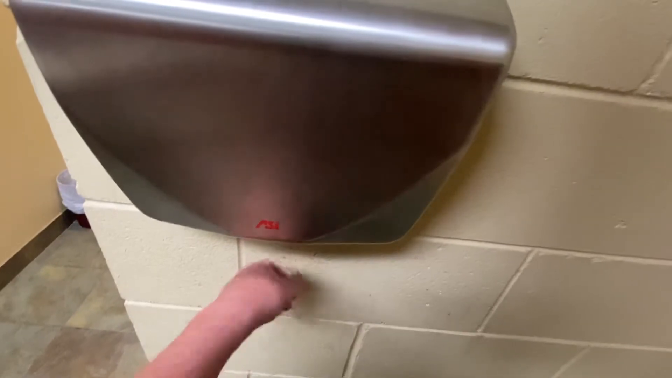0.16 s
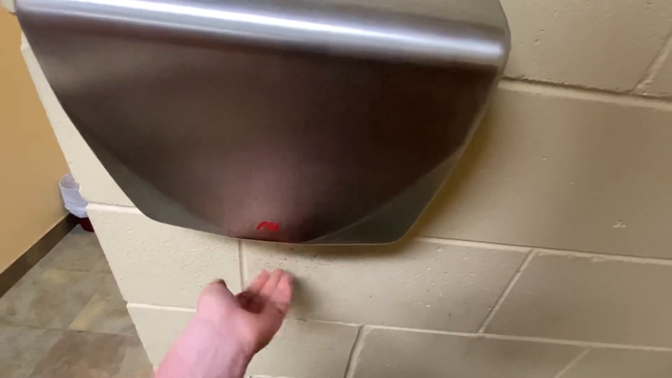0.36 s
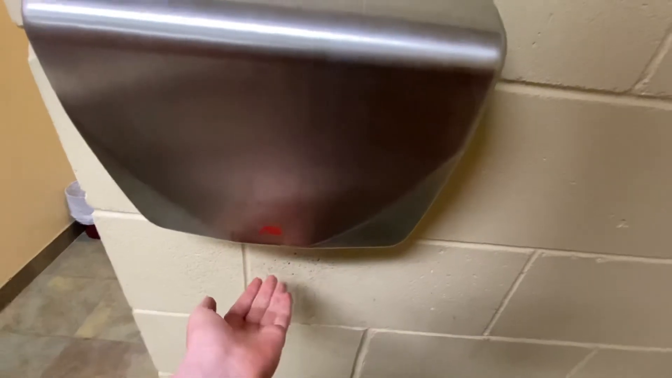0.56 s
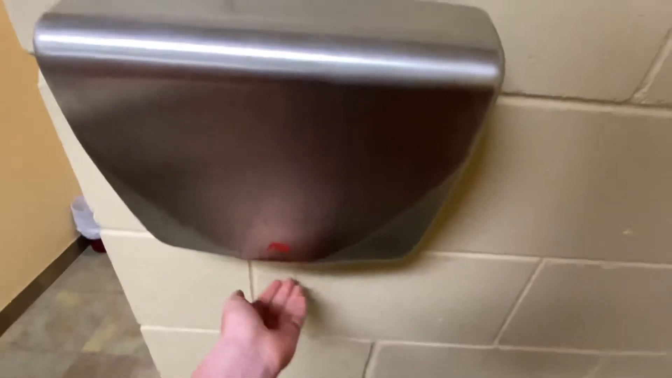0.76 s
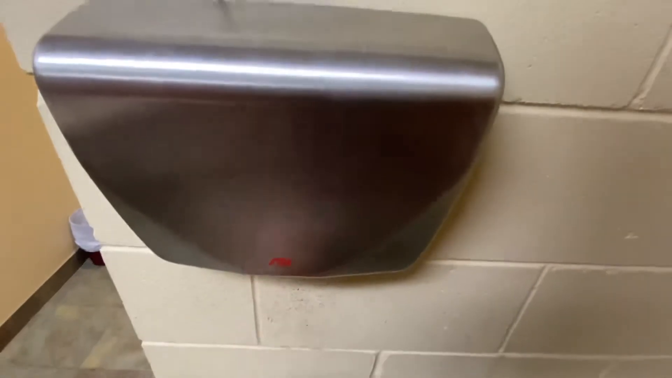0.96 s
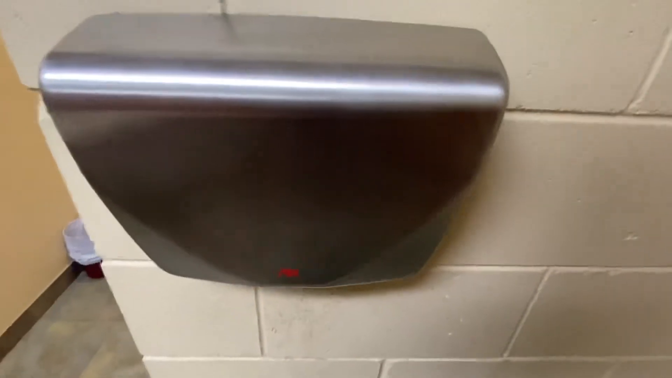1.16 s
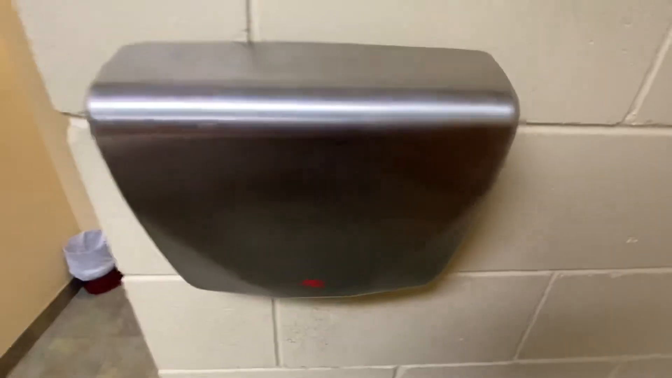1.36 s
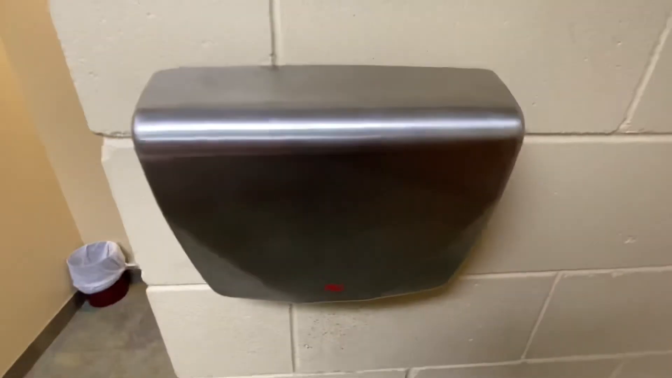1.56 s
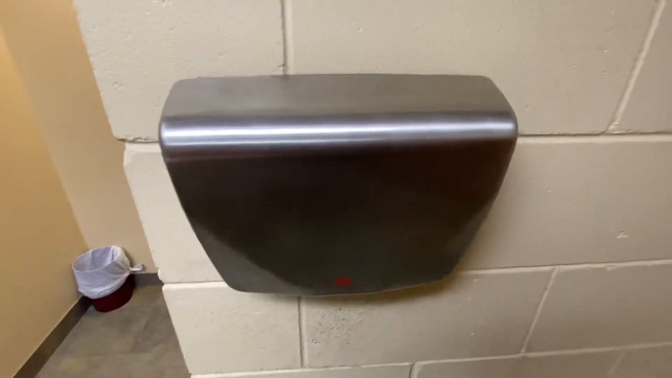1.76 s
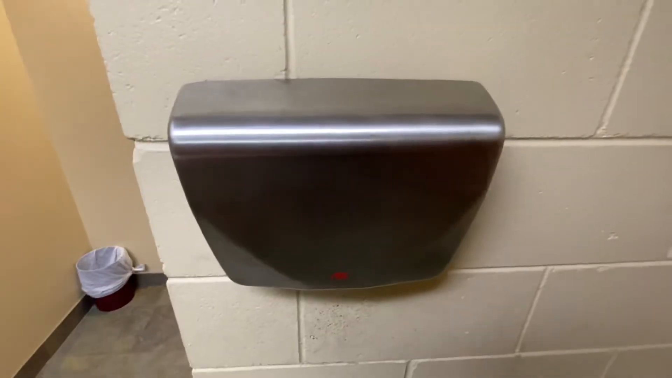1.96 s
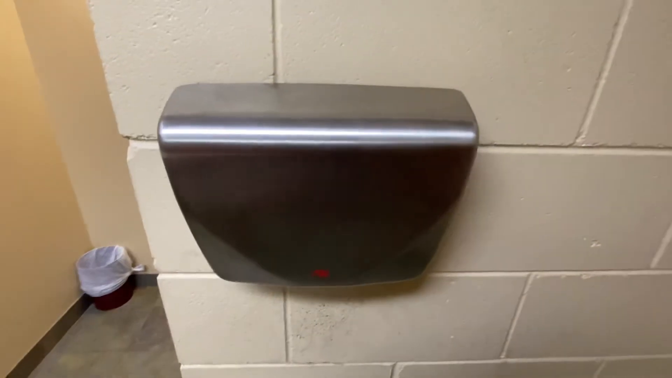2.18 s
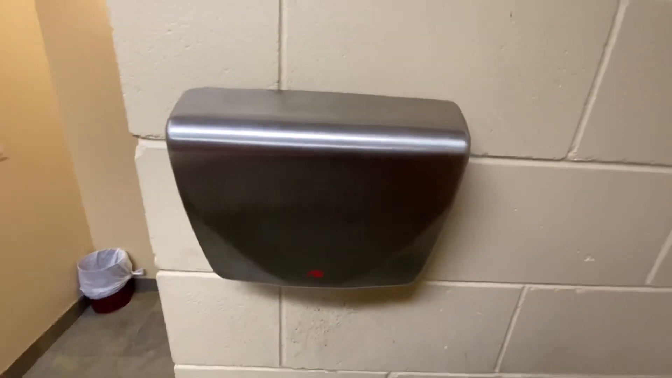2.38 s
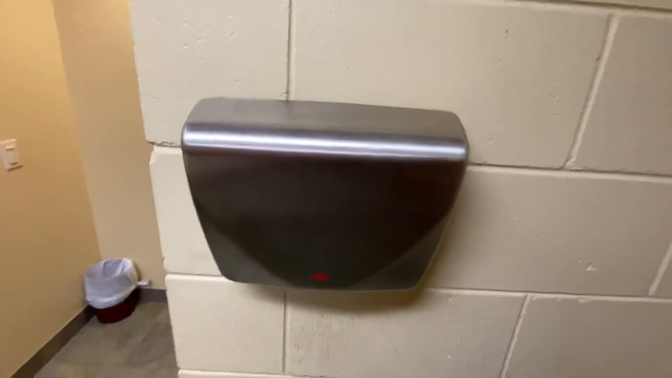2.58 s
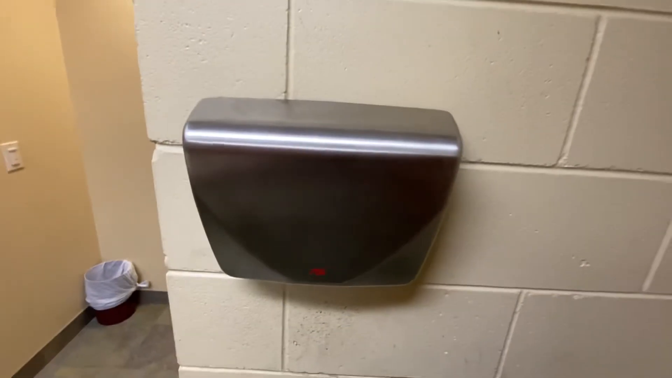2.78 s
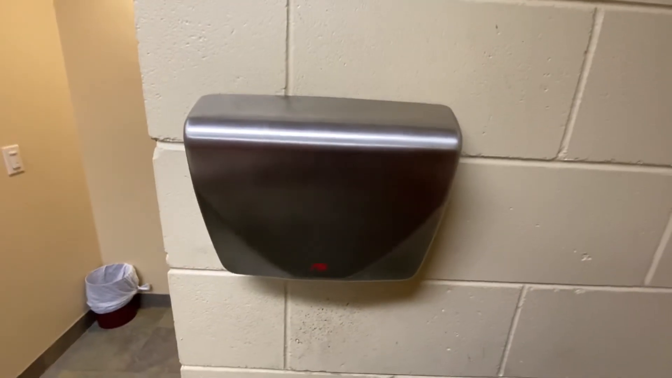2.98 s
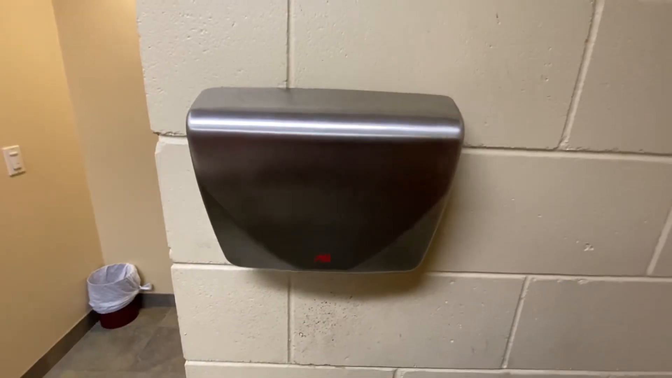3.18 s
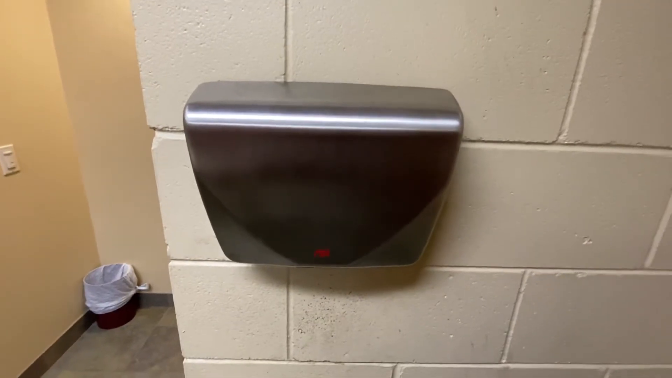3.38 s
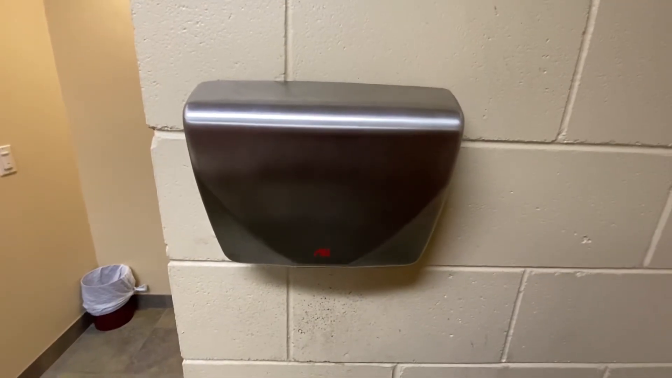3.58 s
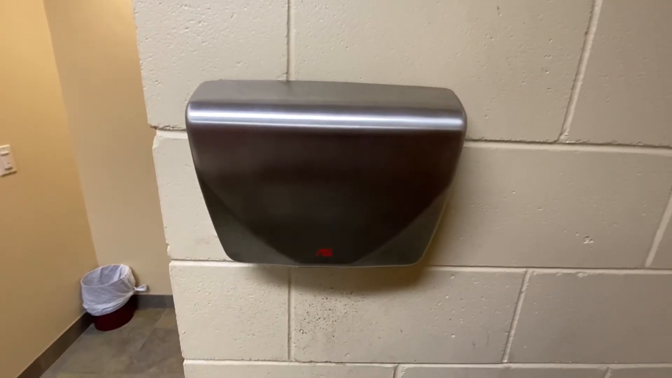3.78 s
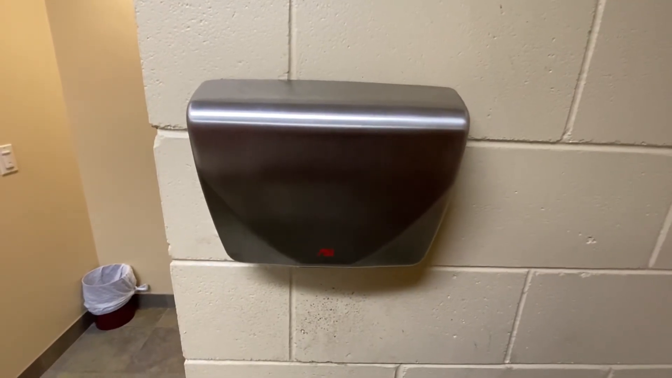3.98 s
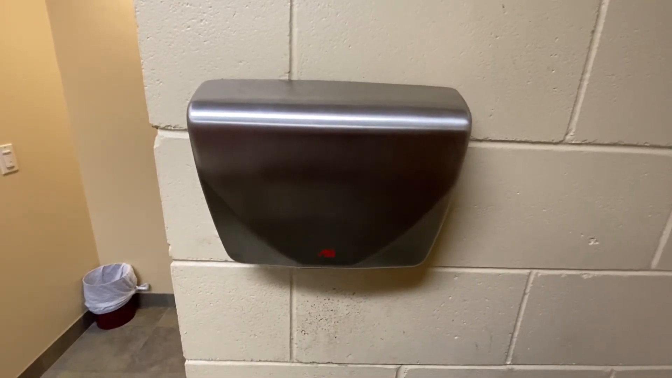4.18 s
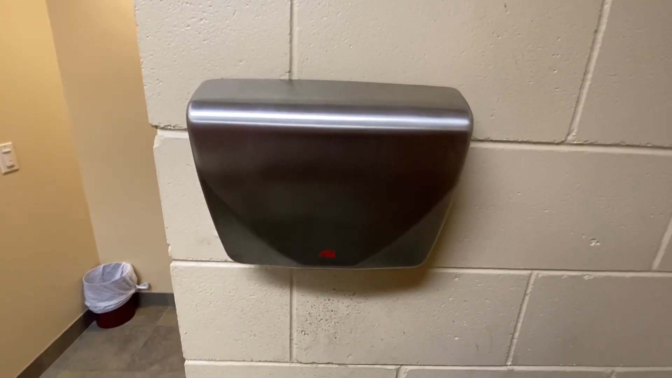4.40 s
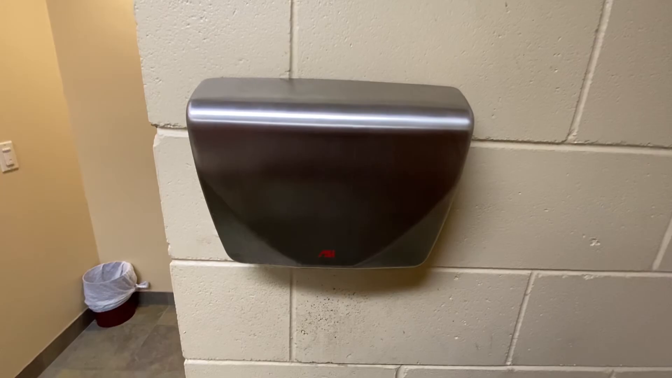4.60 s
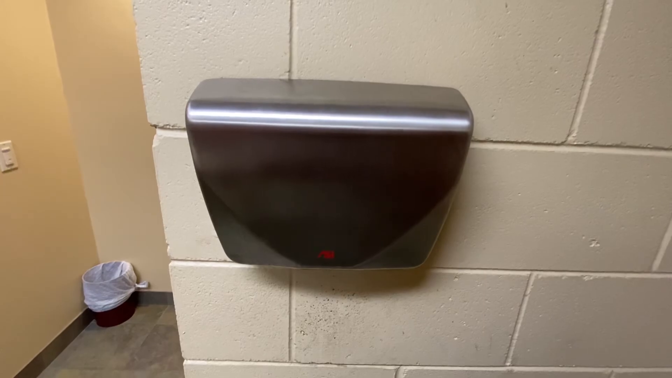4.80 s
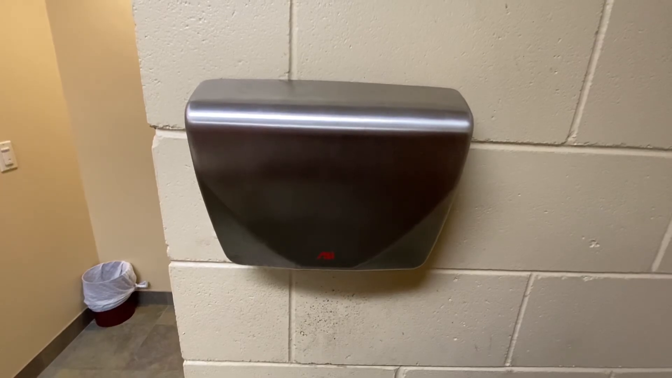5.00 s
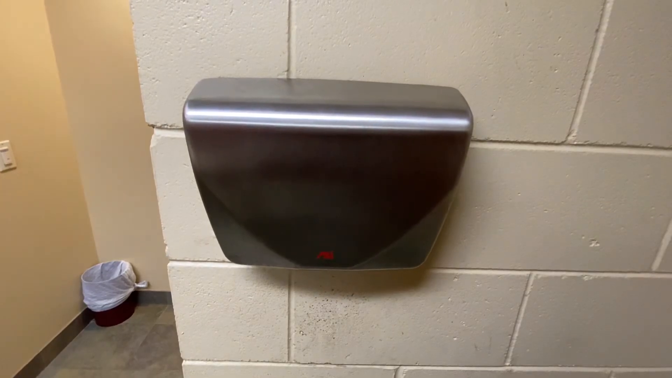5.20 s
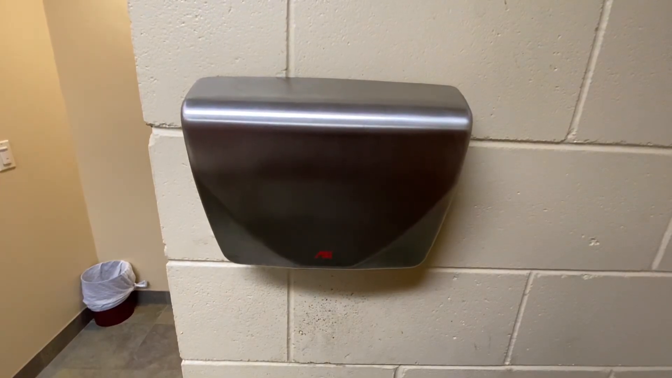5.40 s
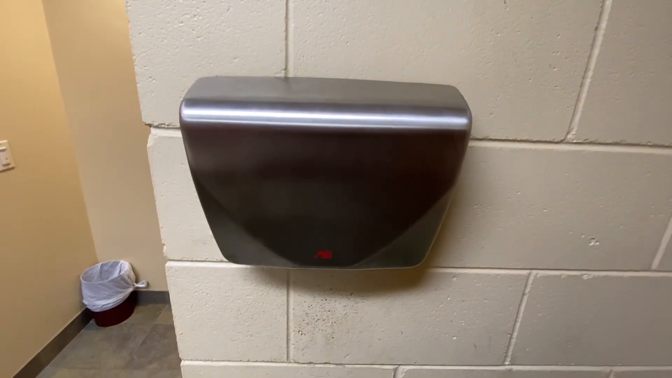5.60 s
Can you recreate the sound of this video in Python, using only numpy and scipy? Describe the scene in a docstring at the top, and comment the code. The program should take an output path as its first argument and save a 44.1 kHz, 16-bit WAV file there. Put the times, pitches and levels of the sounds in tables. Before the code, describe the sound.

Loud rushing air and a shrill whine in a hard-walled restroom wind down smoothly, leaving low fan hum and duct rumble.

```python
"""A roaring air jet and a motor whine come first: a wall hand dryer in a block-walled restroom.
The jet is shaped noise with swelling resonances; the whine is the harmonics of blades chopping the air.
Power drops and the rotor coasts nearly to rest, its whine sweeping down through the casing resonances.
Mains buzz dies away with the motor; the building's ventilation stays as rumble, fan tones and hum.
All is heard from a phone that backs away from the dryer."""
import sys
import numpy as np
from scipy import signal
from scipy.fft import rfft, irfft
from scipy.io import wavfile
from scipy.ndimage import uniform_filter1d

SR = 44100
rng = np.random.default_rng(int(sys.argv[2]) if len(sys.argv) > 2 else 0)


def wav_out(sig):
    """Save sig, one row per channel (or a flat mono array), as 16-bit PCM at SR to the path in sys.argv[1]."""
    wavfile.write(sys.argv[1], SR, np.round(np.clip(np.atleast_2d(sig).T, -1, 1) * 32767).astype(np.int16))


N = 249165
TIME = np.arange(N) / SR
HZ = np.maximum(np.fft.rfftfreq(N, 1 / SR), 1)

# Resonances of jet, casing, wall and room, before the room echoes:
# (centre [Hz], width of each of two passes [Hz], level at full speed [dB],
#  swells: [(time [s], half-length to 1/e [s], level [dB])])
JET_RESONANCES = [(196.3, 25.6, -79, [(.1, 0.62, -41.5), (1.15, 0.86, -42), (1.74, 0.038, -30),
                  (2.03, 0.1, -35.5)]), (287, 113, -57.5, [(3.2, .7, -48.5)]),
                  (424, 280, -57, [(.35, 0.42, -35), (1.35, 0.16, -43.5), (2.3, 0.13, -43)]),
                  (861.4, 180, -38, [(.23, 0.18, -47), (1.65, 0.82, -42), (2.9, 0.3, -47)]),
                  (917, 150, -63, [(1.5, 0.016, -35), (1.78, 0.11, -31.5)]),
                  (1165, 135, -56, [(.4, 0.56, -33.5), (1.38, 0.1, -42)]),
                  (1387, 78, -69, [(4.8, 0.35, -49.5)]), (1429, 76, -62.5, [(1.05, 0.28, -41),
                  (1.65, 0.11, -41)]), (2401, 150, -51, [(2.45, .15, -48), (3.22, 0.15, -46)]),
                  (4000, 1300, -67, [(3.8, .3, -53), (4.6, 0.37, -58)]),
                  (3048, 180, -42.5, [(.65, 0.25, -44), (1.1, 0.12, -45), (1.8, .15, -47),
                  (2.9, 0.065, -52)]), (3160, 690, -36.5, [(0.0, 0.043, -27), (.6, 0.88, -42),
                  (1.74, 0.14, -49), (2.8, 0.16, -44)])]
# Jet spectrum: (frequency [Hz], relative level per Hz [dB])
JET_COLOUR = [(40, -17), (70, -19), (90, -20), (140, -11.5), (200, -9), (400, -11), (600, -12.5), (870, -9),
              (1300, -11.5), (2600, -13.5), (3300, -16.5), (4500, -15.5), (6600, -18.5), (7200, -27.5),
              (10500, -25.5), (12300, -39), (14500, -35.5)]
# Casing resonances: (centre [Hz], width of each of two passes [Hz], relative level [dB])
CASING_MODES = [(438, 40, -10), (878, 60, 0), (1120, 40, -7), (1190, 45, -12), (1295, 45, -3),
                (1365, 65, 1), (1900, 120, -20), (2200, 60, -19), (2380, 130, -16), (2880, 120, -13),
                (3280, 300, -20), (3550, 160, -13), (4200, 500, -8)]
# Harmonics of the blade rate, from the first up: (level under the whine [dB])
WHINE_HARMONICS_DB = [0, -4, -5, -7, -12, -14, -15, -16, -17, -18]
# Weaker tones heard while the motor is driven: (multiple of the shaft rate, level under the whine [dB])
SHAFT_TONES = [(3, -28), (4, -17), (6, -15)]
# Whine before the casing colours it: (time [s], level [dB])
WHINE_LEVEL = [(0, -34), (.2, -35), (.32, -44), (.5, -34), (.66, -34), (.73, -42), (.85, -35), (1.0, -42),
               (1.15, -35), (1.28, -36), (1.45, -47), (1.6, -37), (1.75, -30.5), (2.1, -30.5), (2.18, -39),
               (2.32, -32), (2.75, -31.5), (2.9, -36), (3.02, -43), (3.2, -38), (3.32, -42), (3.5, -43),
               (3.6, -49), (3.66, -45), (4.12, -44.5), (4.4, -48), (4.7, -52), (4.85, -58), (5.0, -60),
               (5.15, -66), (5.3, -80)]
# Mains buzz of the running motor, before it fades: (multiple of the mains, left [dB], right [dB])
BUZZ_TONES = [(1, -38, -31), (3, -34.5, -42.5), (4, -42.5, -41.5), (5, -54, -44.5), (6, -41.5, -56),
              (7, -41.5, -70), (8, -58, -51), (9, -39.5, -75)]
# Fan tones of the ventilation: (frequency [Hz], left [dB], right [dB])
VENT_TONES = [(47.5, -65, -56), (52, -54, -61), (57.87, -47.5, -42), (64.3, -73, -78), (102, -60, -52),
              (113.3, -65, -58), (242.4, -64.5, -50)]
# Hum at twice the mains, midway between left and right: (time [s], level [dB])
HUM_LEVEL = [(0, -38.5), (1.3, -40), (2.1, -42), (2.8, -43), (3.5, -42.5), (5.65, -39)]
# Duct rumble spectrum: (frequency [Hz], relative level per Hz [dB])
VENT_COLOUR = [(40, -19), (70, -20), (85, -9), (130, -27.5), (200, -20), (300, -19.5), (390, -15),
               (440, -25), (700, -19), (900, -18), (1100, -29), (2200, -34.5), (4000, -62), (6500, -52),
               (8000, -59), (10500, -64), (14500, -82)]
# Low room resonances added to the rumble: (centre [Hz], width [Hz], level over the rumble [dB])
VENT_MODES = [(158.9, 2.4, 28.5), (299.7, 19, 14), (347, 39, 1.5)]
# Likeness of left and right noise, before limiting: (frequency [Hz], correlation [-1 to 1])
LIKENESS = [(60, 0.97), (130, 1), (290, 0.65), (630, 0.2), (1390, -0.2), (3040, -0.17), (6660, 0.4),
            (14600, 0.37)]
# Stereo balance of the dryer: (frequency [Hz], left minus right [dB])
LEAN = [(60, -10), (110, -9), (200, -3), (370, -0.5), (690, 4), (1270, 2), (2340, -2), (4300, 2), (7920, 1),
        (14600, -1.5)]

# rotor speed is counted as the blade-passing rate; the drive loses a share at switch-off, then ramps to nothing
FULL_HZ, FLOOR_HZ, BLADES = 3324, 20, 7
OFF_S, OFF_STEP, RAMP_S = 2.66, .15, .7
FRICTION_HZ_PER_S, DRAG_HZ_PER_S = 515, 5600  # braking by brushes, and by air at full speed
SPEED_STEP_S = .01

JET_DB, BACKING_DB_PER_S = -29.5, -.5  # at full speed; loss as the phone backs away
JET_LAW, JET_END_DB = 1.504, -64.5  # dB of roar per dB of speed; what lingers at the end
DRIVE_DB = 2.5  # roar added while the motor is driven
# treble slope: dB per octave at full speed, change per dB of speed, lowest dB per octave
SLOPE_DB, SLOPE_LAW, SLOPE_END_DB = 1.07, 0.28, -6
DULLING_DB_PER_S = -0.2254  # slope lost per second as the phone backs away
RUB_DB, RUB_KNEE_HZ, RUB_LAW = -46.5, 273, 4  # brush rub holds until the rotor nears the knee
WHINE_FLICKER_DB, OVERTONE_FLICKER_DB = 1.5, 3
SHAKE_DIVISOR = 26  # whine pitch over the pitch of the low falling tone
MAINS_HZ = 60.05
BUZZ_OFF_S, BUZZ_FADE_DB_PER_S = 2.75, -21
OVERTONE_FADE_DB_PER_S, OVERTONE_BACKING_DB_PER_S = -58, -3
VENT_DB, HUM_LEAN_DB = -46.5, -5.5  # rumble level; hum left minus right

PLACES, ROOM_T60_S = 11, .5  # phone places along its path; time for echoes to fall 60 dB
AIR_ROOM_DB, MOTOR_ROOM_DB = 3, -9  # echoes over direct sound
# the jet leaves below the phone, nearer one port; the casing faces both
AIR_LAG_S, MOTOR_LAG_S = .0005, .00005
TOP_HZ = 15190


def undb(db):
    """Gain of a level."""
    return 10 ** (np.asarray(db) / 20)


def curve(table):
    """A (time, level) table drawn as straight lines over time."""
    s, level = np.transpose(table)
    return np.interp(TIME, s, level)


def colour(table):
    """A (frequency, value) table on the log-frequency axis."""
    hz, value = np.transpose(table)
    return np.interp(np.log(HZ), np.log(hz), value)


def mode(hz, width):
    """Response of one resonance, gain 1 at its centre."""
    return 1j * HZ * width / (hz ** 2 - HZ ** 2 + 1j * HZ * width)


def walk(rate):
    """Random levels held 1 / rate s and slewed twice; spread near 1."""
    hold = int(SR / rate)
    steps = np.repeat(rng.standard_normal(N // hold + 1), hold)
    return 1.3 * uniform_filter1d(uniform_filter1d(steps, hold), hold)[:N]


def noise_spectrum():
    """Spectrum of white noise."""
    return rfft(rng.standard_normal(N))


def stereo_noise(gain):
    """Spectra of two noises, alike in the bass and much less so higher up."""
    like = np.clip(colour(LIKENESS), -.95, .95)
    mid = noise_spectrum() * np.sqrt((1 + like) / 2)
    side = noise_spectrum() * np.sqrt((1 - like) / 2)
    return gain * np.array([mid + side, mid - side])


def drive(s):
    """Share of full power: one until switch-off, then a step down and a ramp to nothing."""
    ramp = np.clip(1 - (s - OFF_S) / RAMP_S, 0, 1)
    return np.where(s < OFF_S, 1, (1 - OFF_STEP) * ramp)


def speed():
    """Blade rate of the rotor: drive against brush friction and air drag, which grows as speed squared."""
    steps = np.arange(0, TIME[-1] + 2 * SPEED_STEP_S, SPEED_STEP_S)
    rate_hz = [FULL_HZ]
    for s in steps[:-1]:
        push = (FRICTION_HZ_PER_S + DRAG_HZ_PER_S) * drive(s)
        brake = FRICTION_HZ_PER_S + DRAG_HZ_PER_S * (rate_hz[-1] / FULL_HZ) ** 2
        rate_hz.append(max(rate_hz[-1] + SPEED_STEP_S * (push - brake), FLOOR_HZ))
    return np.interp(TIME, steps, rate_hz)


def jet():
    """Turbulent air: the treble dies first as the flow slows; bands flutter a little on their own."""
    flow_db = 20 * np.log10(speed() / FULL_HZ)
    backing_s = np.minimum(TIME, OFF_S)
    level_db = JET_DB + BACKING_DB_PER_S * backing_s + JET_LAW * flow_db + DRIVE_DB * (drive(TIME) - 1)
    level_db = np.maximum(level_db, JET_END_DB)
    slope_db = np.maximum(SLOPE_DB + DULLING_DB_PER_S * backing_s + SLOPE_LAW * flow_db, SLOPE_END_DB)

    gain = undb(colour(JET_COLOUR))
    presence = (HZ > 1500) & (HZ < 6000)  # the band that sets the level
    gain = gain / np.sqrt(np.sum(gain[presence] ** 2) / len(HZ))
    air = gain * noise_spectrum()

    # octave bands overlap and tilt about 3 kHz
    octave = np.clip(np.log2(HZ / 3000), -6, 2)
    roar = 0
    for centre in np.arange(-6, 3.):
        share = np.clip(1 - abs(octave - centre), 0, 1)
        roar = roar + irfft(air * share, N) * undb(slope_db * centre + 1.3 * walk(9))
    roar = roar * undb(level_db)

    for hz, width, steady_db, swells in JET_RESONANCES:
        ring = irfft(mode(hz, width) ** 2 * noise_spectrum(), N)
        size = undb(steady_db + JET_LAW * flow_db)
        for s, half_s, db in swells:
            size = size + undb(db) * np.exp(-((TIME - s) / half_s) ** 2)
        roar = roar + ring / np.std(ring) * size
    return roar


def blade_whine(rate_hz):
    """Blades chop the air into harmonics of their passing rate, with weaker tones of the shaft."""
    # speed trembles slightly, more as the rotor slows, which widens the lines
    tremble = .0035 + .006 * (1 - drive(TIME)) + .017 * (1 - rate_hz / rate_hz[0])
    turns = np.cumsum(rate_hz * (1 + tremble * walk(130))) / SR
    parts = list(enumerate(WHINE_HARMONICS_DB, 1)) + [(m / BLADES, db) for m, db in SHAFT_TONES]
    whine = 0
    for k, db in parts:
        # at full speed the overtones lie far up, where the casing radiates little
        fade = (k * rate_hz < .45 * SR) / (1 + (k * rate_hz / 5000) ** 4)
        if k < 1:  # shaft tones need the drive
            fade = fade * drive(TIME)
        flicker_db = OVERTONE_FLICKER_DB if k > 1 else WHINE_FLICKER_DB
        tone = np.sin(2 * np.pi * (k * turns + rng.random()))
        whine = whine + fade * undb(db + flicker_db * walk(45)) * tone
    return whine * undb(curve(WHINE_LEVEL))


def motor():
    """The whine flares on each casing resonance it crosses; rubbing brushes keep the casing ringing."""
    rate_hz = speed()
    modes = np.sqrt(sum(abs(undb(db) * mode(hz, width) ** 2) ** 2 for hz, width, db in CASING_MODES))
    plain = undb(-3) * HZ ** 2 / (HZ ** 2 + 900 ** 2)  # radiation between the resonances
    whine = irfft(rfft(blade_whine(rate_hz)) * np.hypot(plain, undb(16) * modes), N)

    # the brushes rub unevenly and sound the lower resonances between the flares
    uneven = rng.standard_normal(N) * undb(1.5 * walk(30))
    rub = irfft(rfft(uneven) * modes / (1 + (HZ / 2300) ** 3), N)
    rub_db = RUB_DB + RUB_LAW * 20 * np.log10(rate_hz / np.hypot(rate_hz, RUB_KNEE_HZ))
    return whine + rub / np.std(rub) * undb(rub_db)


def shake():
    """A low tone falls with the rotor and swells as it passes a resonance of the mounting."""
    turns = np.cumsum(speed()) / SR / SHAKE_DIVISOR
    shaken = irfft(rfft(np.sin(2 * np.pi * turns)) * mode(99.4, 9.0) ** 2, N)
    return shaken * undb([[-38], [-36]])


def tones(rows, waver_db):
    """Low tones of fixed pitch and gently wavering level, each balanced left and right."""
    out = []
    for hz, left_db, right_db in rows:
        gain = undb(np.array([[left_db], [right_db]]) + waver_db * walk(4.3))
        out.append(gain * np.sqrt(2) * np.sin(2 * np.pi * (hz * TIME + rng.random())))
    return out


def buzz():
    """Mains pull on the running motor; it dies away when power drops, the overtones fastest."""
    after_s = np.maximum(TIME - BUZZ_OFF_S, 0)
    rows = [(k * MAINS_HZ, left, right) for k, left, right in BUZZ_TONES]
    low, *overtones = tones(rows, waver_db=1.86)
    overtone_db = OVERTONE_BACKING_DB_PER_S * TIME + OVERTONE_FADE_DB_PER_S * after_s
    return low * undb(BUZZ_FADE_DB_PER_S * after_s) + sum(overtones) * undb(overtone_db)


def ventilation():
    """Duct rumble in the room's low resonances, fan tones and a hum at twice the mains."""
    resonances = sum(undb(db) * mode(hz, width) for hz, width, db in VENT_MODES)
    rumble = irfft(stereo_noise(undb(colour(VENT_COLOUR)) * (1 + resonances)), N)
    rumble = rumble * undb(VENT_DB + 1.5 * walk(3)) / np.std(rumble)
    hum_gain = undb(curve(HUM_LEVEL) + HUM_LEAN_DB * np.array([[.5], [-.5]]))
    hum = hum_gain * np.sqrt(2) * np.sin(2 * np.pi * 2 * MAINS_HZ * TIME)
    return rumble + hum + sum(tones(VENT_TONES, waver_db=0.5))


def room(x, echo_db, lag_s):
    """Direct sound, later at one port, plus dense echoes that change as the phone moves from place to place."""
    spectrum = rfft(x) * undb(np.array([colour(LEAN), -colour(LEAN)]) / 2)
    lag = np.exp(-2j * np.pi * HZ * np.array([[0], [lag_s]]))
    direct = irfft(spectrum * lag, N)
    decay = np.exp(-np.log(1000) * TIME / ROOM_T60_S) * (TIME > .003)
    decay = decay / np.sqrt(np.sum(decay ** 2))
    echoes = 0
    for place in np.linspace(0, 1, PLACES):
        tail = irfft(stereo_noise(1), N) * decay
        near = np.clip(1 - abs(TIME / TIME[-1] - place) * (PLACES - 1), 0, 1)
        echoes = echoes + np.sqrt(near) * irfft(spectrum * rfft(tail), N)
    return (direct + undb(echo_db) * echoes) / np.sqrt(1 + undb(2 * echo_db))


def scene():
    """All sources at the phone."""
    dryer = room(jet(), AIR_ROOM_DB, AIR_LAG_S) + room(motor(), MOTOR_ROOM_DB, MOTOR_LAG_S)
    return dryer + shake() + buzz() + ventilation()


def record(dry):
    """The phone cuts the lowest bass and the top."""
    no_bass = signal.sosfilt(signal.butter(2, 38, "high", fs=SR, output="sos"), dry)
    return signal.sosfilt(signal.ellip(16, .2, 70, TOP_HZ, fs=SR, output="sos"), no_bass)


dry = scene()
out = record(dry)
wav_out(out)
```